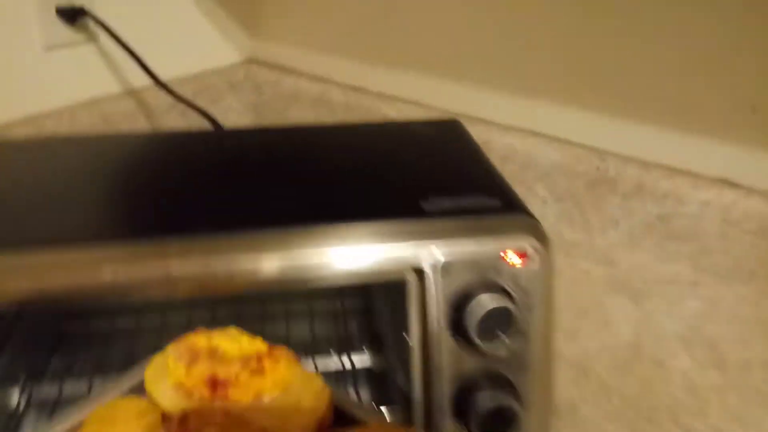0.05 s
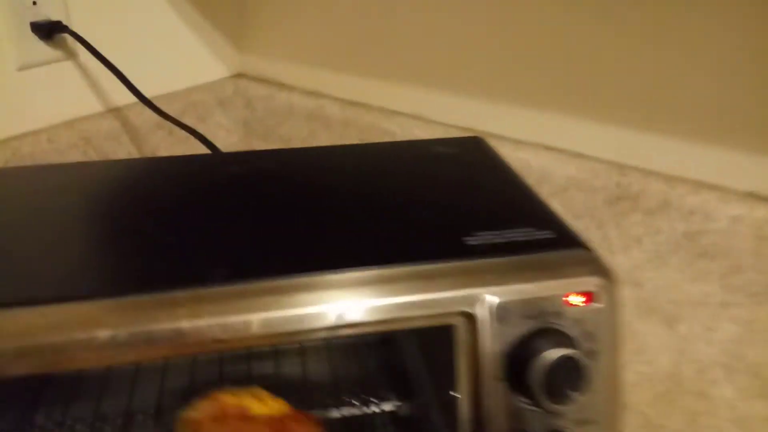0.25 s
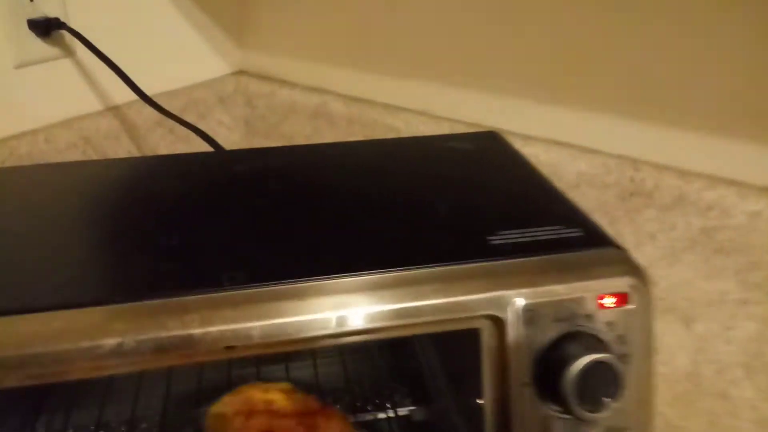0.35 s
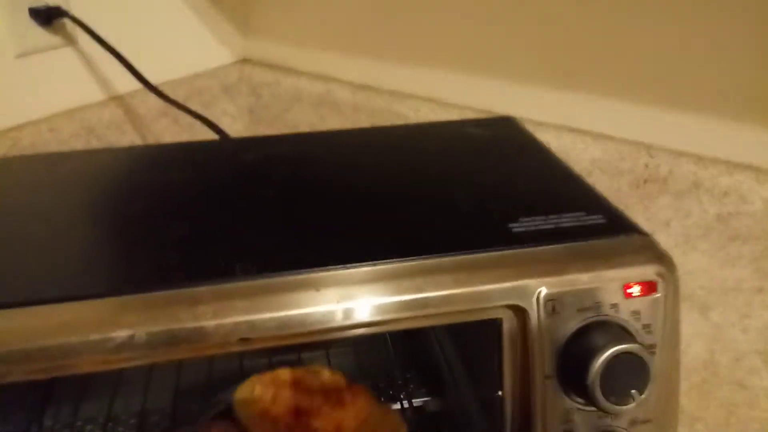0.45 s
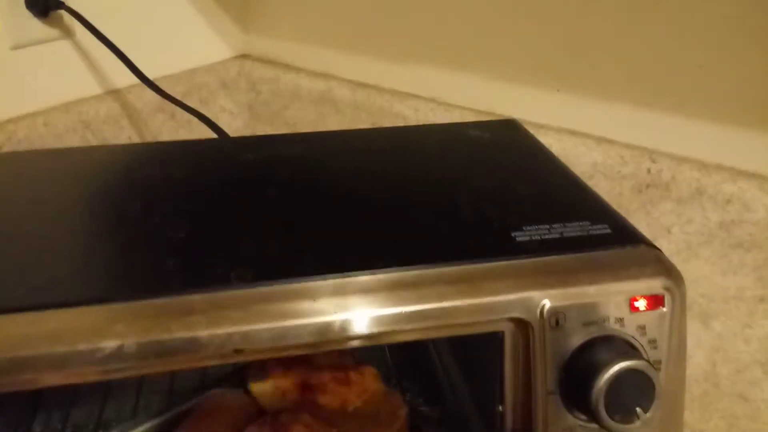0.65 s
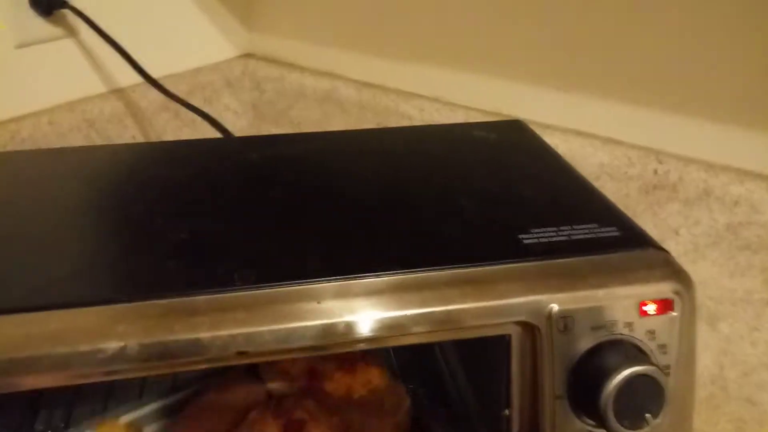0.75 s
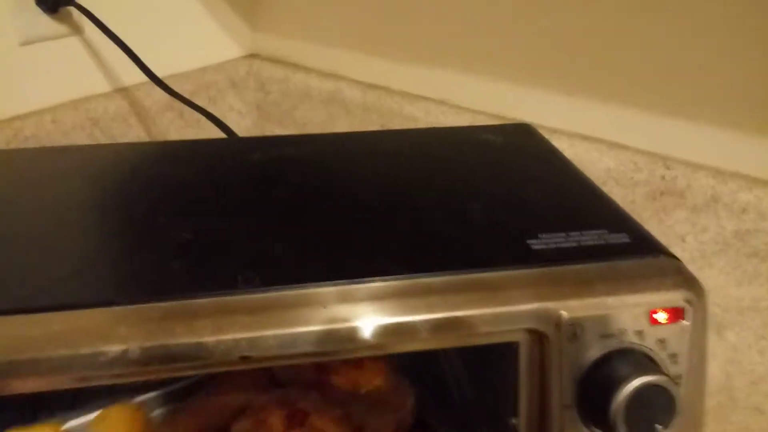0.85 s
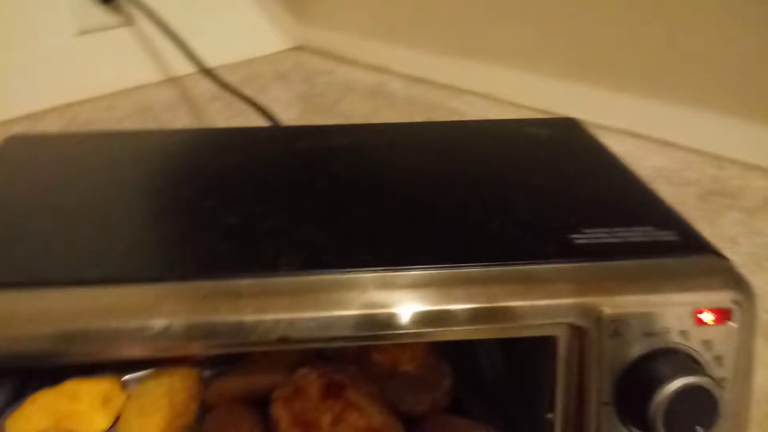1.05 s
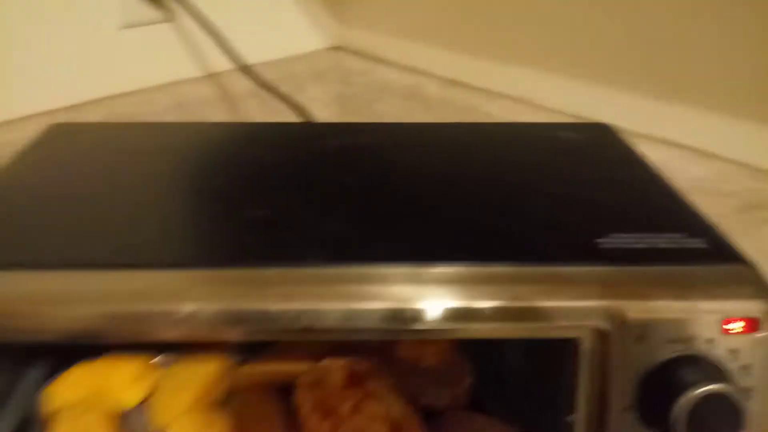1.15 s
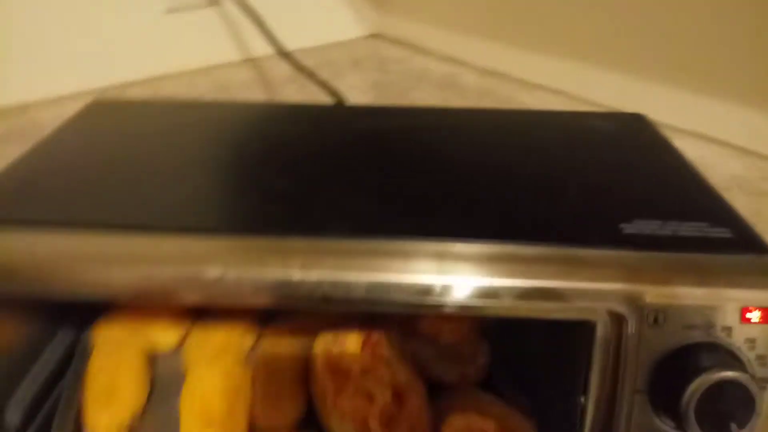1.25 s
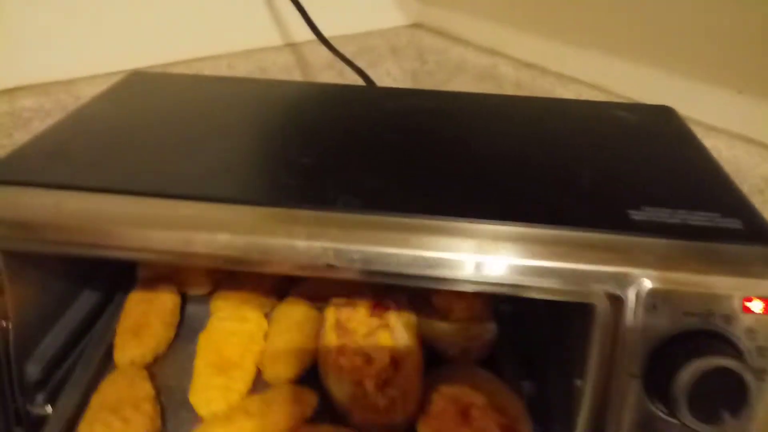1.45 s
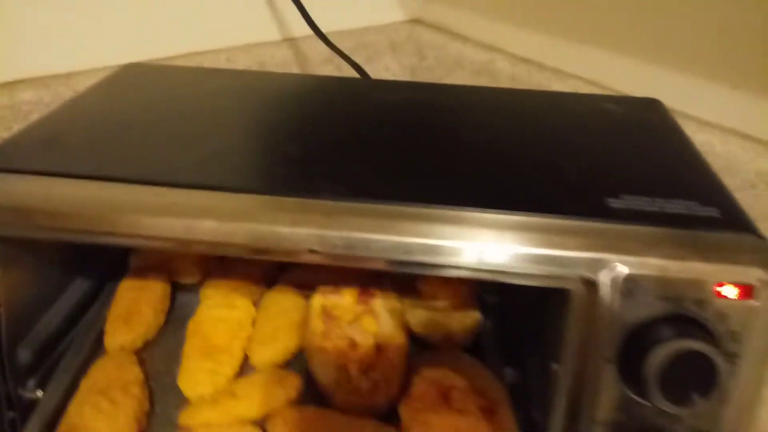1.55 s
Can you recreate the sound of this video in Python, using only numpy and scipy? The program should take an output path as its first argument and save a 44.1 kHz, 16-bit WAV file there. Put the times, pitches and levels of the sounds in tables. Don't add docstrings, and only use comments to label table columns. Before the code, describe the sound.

Thin metal baking tray slides onto an oven rack with loud bangs, rattles and scraping, then settles

```python
import sys
import numpy as np
from scipy import signal
from scipy.fft import rfft, irfft
from scipy.io import wavfile
from scipy.ndimage import uniform_filter1d

SR = 44100
rng = np.random.default_rng(int(sys.argv[2]) if len(sys.argv) > 2 else 0)


def invert_db(level):
    return 10 ** (np.asarray(level, dtype=float) / 20)


def bounce(signal):
    frames = np.transpose(np.atleast_2d(signal))
    limited = np.clip(frames, -1, 1)
    pcm = np.round(limited * 32767).astype(np.int16)
    wavfile.write(sys.argv[1], SR, pcm)


N = 70560

# freq_hz, level_db
NOISE_COLOUR = [(30, -28), (100, -19), (200, -21), (320, 5.5), (410, -5), (1630, 0.5), (2100, -20),
                (7000, -12.5), (10000, -21.5), (16000, -30)]
# start_s, level_db
TOUCHES = [
    (.0690, -42),
    (0.1286, -41.5),
]
# freq_hz, level_db, t60_s
WIRE_MODES = [(1800, 0, .016), (2250, -6, .012), (2900, -14, .008), (4300, -22, .006)]
# start_s, freq_hz, level_db, # length_s
FAVOURED_MODES = [(0.1365, 1293, -32, 0.0057), (0.136, 1620, -42, 0.014), (.224, 519.7, -29.5, 0.049),
                  (.224, 1380, -27.5, 0.022), (0.138, 653, -48.5, 0.011), (.155, 720, -47, 0.022),
                  (0.154, 1306, -47, 0.022), (0.184, 1200, -55, 0.025), (0.319, 227, -37.5, 0.077),
                  (.335, 560, -31, 0.034), (0.486, 1640, -28.5, 0.022), (.4846, 592, -44, 0.13),
                  (0.521, 287, -42, 0.16), (0.4865, 101.5, -43, 0.035), (0.6628, 3000, -39, 0.016),
                  (0.824, 569, -38, 0.033), (0.87, 228.3, -26, 0.05), (0.883, 74, -38.5, 0.045),
                  (.885, 370, -34.5, 0.13), (1.003, 104, -49.5, 0.17), (1.038, 283.8, -41, 0.084),
                  (1.403, 1067, -46.5, 0.024), (1.404, 1612, -46, 0.019), (.0775, 2200, -52, 0.0055),
                  (.108, 1653, -57, 0.015), (.925, 367, -35.5, 0.032), (.224, 1470, -34, 0.045),
                  (.222, 1100, -37.5, 0.024), (.227, 754, -32.5, 0.054), (0.3, 570, -34, 0.027),
                  (.268, 1690, -36, 0.037), (.272, 330, -36, 0.022), (.29, 1600, -38.5, 0.068),
                  (.322, 330, -39, 0.023), (.323, 1660, -41, 0.018), (0.336, 1050, -35, 0.037),
                  (.338, 1279, -31.5, 0.042), (.485, 2445, -34, 0.016), (.877, 1481, -29, 0.029),
                  (.87, 740, -33, 0.023), (.884, 651, -30.5, 0.035), (.872, 2330, -34, 0.031),
                  (.87, 2080, -35, 0.018), (.882, 1614, -35, 0.034), (.94, 1650, -38, .05),
                  (.935, 2000, -40.5, .04), (.955, 500, -38.5, .06), (.995, 905, -40, 0.043),
                  (.99, 1268, -45, 0.041), (1.215, 565, -44, 0.044),
                  (.4848, 3700, -36, .004), (.4848, 3100, -30, 0.0069), (1.155, 582, -47.5, 0.075),
                  (.66, 572, -49, 0.098), (.23, 223, -34.5, 0.059), (0.4, 300, -38, 0.027),
                  (0.56, 323, -40, 0.028), (.59, 1469, -51, 0.055), (.58, 1500, -51, 0.046),
                  (1.1, 280, -46.5, .03), (1.15, 1650, -51, 0.028), (1.285, 330, -48.5, 0.033),
                  (1.33, 470, -52, 0.071), (1.408, 1270, -53, 0.019), (1.48, 800, -55.5, .05),
                  (1.5, 1270, -57, .07), (1.479, 3100, -53.5, .01)]
# start_s, length_s, level_db, upper_mode_db
CREAKS = [
    (0.11, 0.01, -60, 12.5),
    (1.533, 0.077, -54.5, -9),
]
KNOCK_START_S = [.1305, .2213, .2299, .255, .3202, .331, .378, .4279, .4846, .6384, .6625, .851, .8594,
                 .8684, .885, .9433, 1.0041, 1.0141, 1.0944, 1.1528, 1.255, 1.4017, 1.4157, 1.48]
# strength_db, boom_db, edge_db, chatter_length_s, first_contact_db
KNOCKS = [(-34, -37, -11, 0.019, -4), (-11, -9.5, -14, 0.017, 16.5), (-22, 1.5, -9.5, 0.025, 12),
          (-20.5, -1.5, -13.5, 0.084, 17), (-15, -38, -11, 0.017, 20), (-21.5, -21, -11.5, .025, 3),
          (-19, -9, -13.5, 0.027, 15), (-27.5, 2.5, -7, 0.01, 20), (-16, -7.5, -12.5, 0.014, 24.5),
          (-31, -15, -8.5, 0.035, 18.5), (-26.5, -17, -13, 0.038, 23.5), (-36.5, -24, -12, 0.024, 17),
          (-27.5, -2.5, -9.5, 0.015, 7), (-14.5, -24, -6.5, 0.03, 13.5), (-23, 0, -39, 0.053, -1),
          (-22.5, -30, -6.5, 0.028, 20), (-30, 0, -4, 0.019, 23), (-27, -28, -9.5, 0.0089, 25.5),
          (-27.5, -15, -8, 0.0063, 11), (-37.5, -1.5, -10, 0.024, 25), (-47.5, -28, -6.5, 0.062, 23),
          (-33.5, -28, -10.5, 0.011, 14.5), (-37, -14, -7.5, 0.018, 14), (-40.5, -11, -6.5, 0.012, 20.5)]
# time_s, level_db, brightness_db
DRAG = [(0.132, -75, 25), (.21, -57, -3.5), (0.251, -32, 9.5), (.4, -72, 13), (.5, -39.5, 3.5),
        (.62, -46, 0), (.7, -47, 0), (0.839, -42.5, 1.5), (.95, -32, 4.5), (1.08, -49, 11),
        (1.2, -43.5, 3.5), (1.301, -48.5, 0.5), (1.345, -71, -15), (1.4, -58, 5), (1.5, -51.5, 4),
        (1.6, -52, -0.5)]
# freq_hz, level_db, t60_s
SHEET_MODES = [(103, -12, 0.15), (220.3, 3.5, 0.23), (233.2, 1, 0.22), (285, -2.5, 0.35),
               (324.3, 3.5, 0.22), (370.7, -3, 0.28), (498.2, -0.5, 0.25), (549.3, -2, 0.3),
               (643.4, -3.5, 0.25), (750, -19, 0.22), (1272, 10.5, 0.18), (1388, 6, 0.26),
               (1590, -19, 0.45), (1690, -19, 0.43)]
# freq_hz, level_db, t60_s
STRUCK_WIRE_MODES = [(1050, -4, 0.024), (1640, 6.5, 0.097), (2280, 1, 0.11), (3060, -7, 0.062),
                     (6340, 11, 0.017), (7700, -22, .03), (11740, 5.5, 0.023)]
# freq_hz, level_db, t60_s
RESTING_MODES = [(102, -13, 0.21), (204, -9, 0.39), (288, -4, 0.14), (341.6, -2, 0.22), (571, -4, 0.25),
                 (798, -7, 0.42), (921, -2.5, 0.28), (1195, -5.5, 0.13), (1282, -8, 0.14), (1378, -5, 0.14),
                 (1472, -11, 0.12), (1634, -6, .15)]
# freq_hz, level_db
BODY_COLOUR = [(24, -50), (40, -14), (224, -2.5), (371, -7), (423, -10), (509, -4.5), (829, -12),
               (1480, -5), (2150, -12), (2900, -11.5), (4550, -40)]
# freq_hz, level_db
EDGE_COLOUR = [(2060, -27), (3500, -11), (5030, -9.5), (6570, 0), (8470, -1.5), (11100, -16.5),
               (13400, -17.5), (15100, -10.5), (16000, -2)]
# freq_hz, t60_s
RING_TIME = [(60, 0.68), (300, 0.14), (900, 0.12), (2500, 0.062), (7000, 0.053), (15000, 0.018)]
# start_s, level_db
SLAPS = [(0.1396, -46.5), (.2256, -13), (0.2309, -25), (0.2348, -15), (0.2393, -23), (.243, -16),
         (0.2581, -15), (.2858, -21), (0.3268, -22), (0.4864, -24), (.4873, -22.5), (0.4918, -19),
         (0.8715, -28), (0.876, -21), (0.8801, -22), (.8948, -19), (.8973, -14), (.9316, -21), (.9458, -27),
         (1.4167, -38)]

BOOM_DB, CLANG_DB, EDGE_DB = 0, -9.5, -1.5
CRACK_T60_SHARE = 0.057


def rms_one(x):
    return x / np.sqrt(np.mean(x ** 2) + 1e-20)


def at_hz(points, hz):
    points_hz, value = np.transpose(points)
    return np.interp(np.log(hz), np.log(points_hz), value)


def conv(a, b):
    return signal.fftconvolve(a, b)[:N]


def high_pass(x, hz):
    return signal.sosfilt(signal.butter(4, hz, "high", fs=SR, output="sos"), x)


def modes(hz, gain, t60_s):
    t = np.arange(int(SR * min(.5, np.max(t60_s))))[:, None] / SR
    decay = np.exp(-np.log(1000) * t / t60_s)
    h = (decay * np.sin(2 * np.pi * hz * t)) @ gain
    return h / np.sqrt(np.sum(h ** 2))


def named(table, level_db):
    hz, db, t60_s = np.transpose(table)
    return invert_db(level_db) * modes(hz, invert_db(db), t60_s)


def dense(colour, low_hz, high_hz, count, t60_share=1):
    hz = low_hz + (high_hz - low_hz) * (np.arange(count) + rng.random(count)) / count
    t60_s = t60_share * np.clip(at_hz(RING_TIME, hz), .005, 2) * rng.uniform(0.56, 1.31, count)
    gain = invert_db(at_hz(colour, hz)) / np.sqrt(t60_s)
    return modes(hz, gain[:, None] * rng.choice([-1, 1], (count, 4)), t60_s)


def strike(force, body):
    count = body.shape[1]
    point = rng.integers(0, count, N)
    return sum(conv(force * (point == k), body[:, k]) for k in range(count)) * np.sqrt(count)


def grains(per_s):
    size_db = 4 * np.minimum(rng.exponential(1, N), 4)
    size = invert_db(size_db) * rng.choice([-1, 1], N)
    return rms_one(size * (rng.random(N) < per_s / SR))


def floor():
    hz = np.maximum(np.arange(N // 2 + 1) * SR / N, 10)
    spectrum = rfft(rng.standard_normal(N)) * invert_db(at_hz(NOISE_COLOUR, hz))
    return invert_db(-63.5) * rms_one(irfft(spectrum, N))


def touches():
    clicks = np.zeros(N)
    for start_s, level_db in TOUCHES:
        clicks[int(start_s * SR)] = invert_db(level_db + 18)
    soft_clicks = conv(clicks, np.hanning(11) / 3)
    return high_pass(conv(soft_clicks, named(WIRE_MODES, 0)), 1400)


def favoured():
    rise_s, waver_db, waver_rad, waver_s = 0.0018, 2.2, .35, .012
    start_s, hz, level_db, length_s = np.transpose(FAVOURED_MODES)
    age_s = np.maximum(np.arange(N)[:, None] / SR - start_s, 0)
    size = int(waver_s * SR)
    flex = uniform_filter1d(rng.standard_normal((N, 4)), size=size, axis=0)
    flex = rms_one(uniform_filter1d(flex, size=size, axis=0))
    dealt = np.arange(len(start_s))
    swell = (1 - np.exp(-age_s / rise_s)) * np.exp(-(age_s / length_s) ** 2)
    swell = swell * invert_db(waver_db * flex[:, dealt % 4])
    phase = 2 * np.pi * hz * age_s + waver_rad * flex[:, (dealt + 1) % 4]
    return (swell * np.sin(phase)) @ invert_db(level_db + 1.5)


def creaks():
    t, out = np.arange(N) / SR, np.zeros(N)
    slips = grains(per_s=1700)
    mode_hz = np.array([620, 780, 1290, 1600])
    for start_s, length_s, level_db, upper_db in CREAKS:
        shape = np.clip((t - start_s) / .003, 0, 1) * np.clip((start_s + length_s - t) / .006, 0, 1)
        body = modes(mode_hz, invert_db(np.array([0, -5, upper_db, upper_db - 25])), t60_s=.028)
        out += invert_db(level_db) * conv(shape * slips, body)
    return out


def knocks():
    t = np.arange(N) / SR
    force, crack = np.zeros((3, N)), np.zeros((2, N))
    chatter = grains(per_s=2700)
    for start_s, (db, boom_db, edge_db, length_s, first_db) in zip(KNOCK_START_S, KNOCKS):
        first = int(start_s * SR)
        decay = (t >= start_s) * np.exp(-np.maximum(t - start_s, 0) / max(length_s, .002))
        burst = decay * chatter
        burst[first] += invert_db(first_db)
        split_db = np.array([boom_db + BOOM_DB, CLANG_DB, edge_db + EDGE_DB])
        crack[:, first] = invert_db(db + first_db + split_db[1:])
        force += invert_db(db + split_db)[:, None] * burst
    return force, crack


def drag():
    t = np.arange(N) / SR
    time_s, level_db, bright_db = np.transpose(DRAG)
    level = np.interp(t, time_s, level_db, left=-120)
    rub = invert_db(level - 6.5) * grains(per_s=2500)
    return rub, np.interp(t, time_s, bright_db)


def boom(force):
    rise_s = 0.02
    low = named(SHEET_MODES[:10], -4.5)
    low = low * (1 - np.exp(-np.arange(len(low)) / SR / rise_s))
    return conv(force, low) + invert_db(-10) * strike(force, dense(BODY_COLOUR, 90.1, 793.7, count=60))


def clang(force, crack):
    out = strike(force, dense(BODY_COLOUR, 498.0, 3205.4, count=300))
    out += conv(force, named(SHEET_MODES[10:], -12.5))
    out += strike(crack, invert_db(-5.0) * dense(BODY_COLOUR, 830, 3800, 60, CRACK_T60_SHARE))
    out += conv(crack, named(STRUCK_WIRE_MODES, -6.5))
    return high_pass(out, 570)


def edge(force, crack):
    out = strike(force, dense(EDGE_COLOUR, 3200, 17000, count=900))
    out += invert_db(-5.5) * strike(crack, dense(EDGE_COLOUR, 4000, 17800, 200, CRACK_T60_SHARE))
    return high_pass(out, 2360)


def tray():
    force, crack = knocks()
    rub, bright_db = drag()
    force += invert_db(np.array([8 - bright_db, np.zeros(N), bright_db - 5])) * rub
    resting = conv(invert_db(-bright_db) * rub, named(RESTING_MODES, 3.5))
    return boom(force[0]) + clang(force[1], crack[0]) + edge(force[2], crack[1]) + resting


def slaps():
    length_s = 0.00054
    start_s, level_db = np.transpose(SLAPS)
    age = (np.arange(N)[:, None] / SR - start_s) / length_s
    return high_pass(np.sin(np.pi * np.clip(age, 0, 1)) ** 2 @ invert_db(level_db), 190)


def room(x):
    t60_s, rise_s, cut_hz = 0.68, 0.019, 2070
    t = np.arange(SR // 2) / SR
    tail = rng.standard_normal(len(t)) * np.exp(-np.log(1000) * t / t60_s) * np.clip(t / rise_s, 0, 1)
    tail = signal.sosfilt(signal.butter(1, cut_hz, fs=SR, output="sos"), tail)
    return invert_db(-18.5) * conv(x, tail / np.sqrt(np.sum(tail ** 2)))


def scene():
    metal = tray() + slaps() + favoured()
    metal += high_pass(creaks() + touches(), 380)
    return (metal + room(metal) + floor())[None]


def band_limit(x):
    return signal.sosfilt(signal.butter(12, 17140, fs=SR, output="sos"), x)


def record(dry):
    top, lopsided = 0.43, 0.78
    bent = top * np.tanh((dry + lopsided * dry ** 2) / top)
    cut = signal.sosfilt(signal.cheby2(10, 42, 16100, fs=SR, output="sos"), bent)
    mix = signal.sosfilt(signal.butter(2, 53, "high", fs=SR, output="sos"), cut)
    return band_limit(mix)


dry = scene()
out = record(dry)
bounce(out)
```